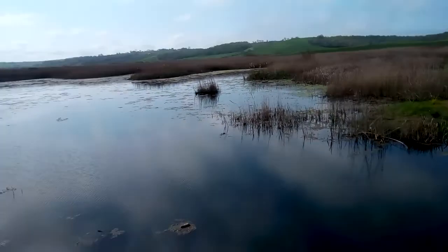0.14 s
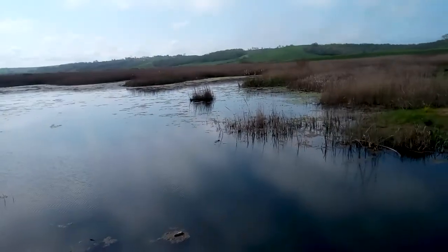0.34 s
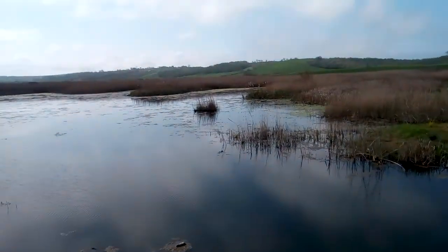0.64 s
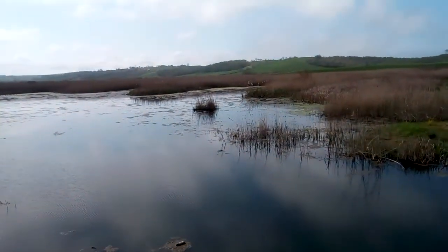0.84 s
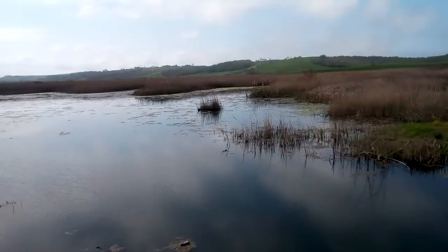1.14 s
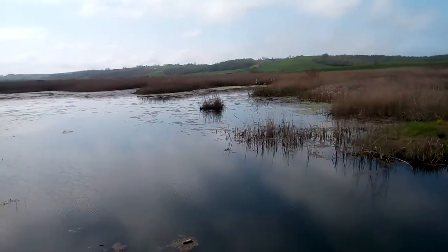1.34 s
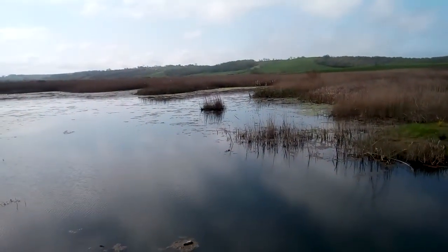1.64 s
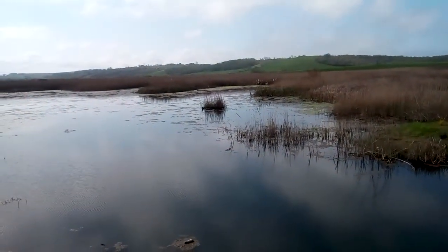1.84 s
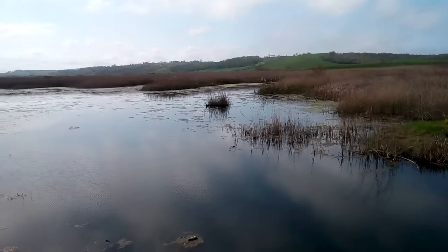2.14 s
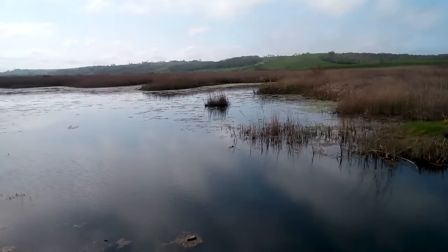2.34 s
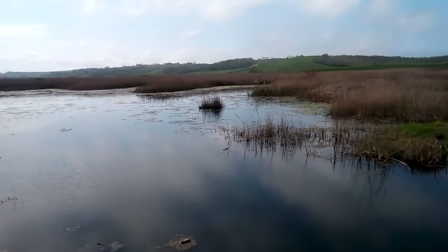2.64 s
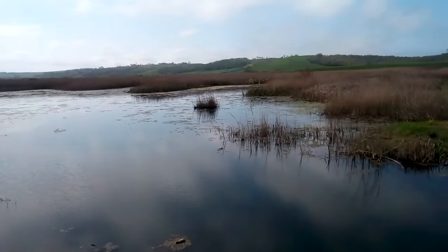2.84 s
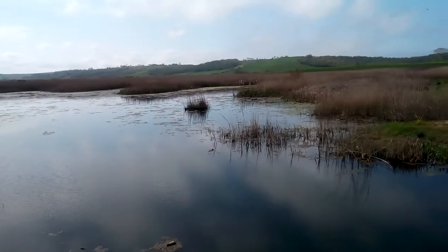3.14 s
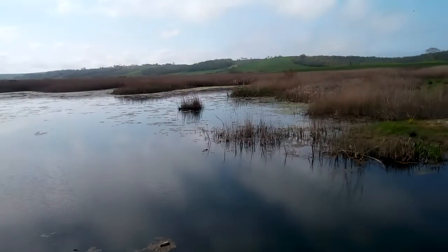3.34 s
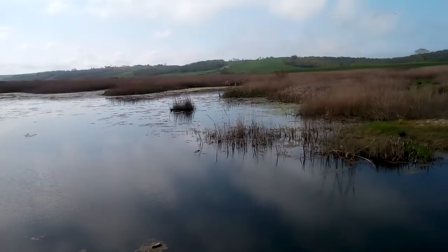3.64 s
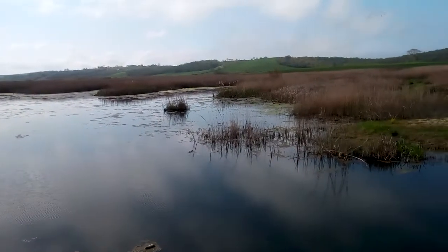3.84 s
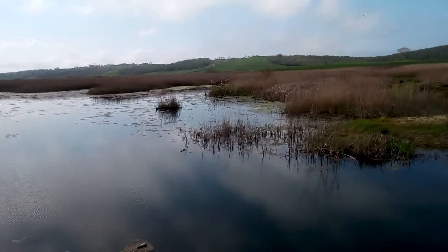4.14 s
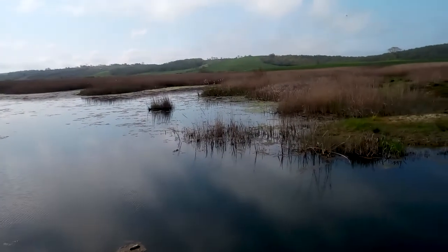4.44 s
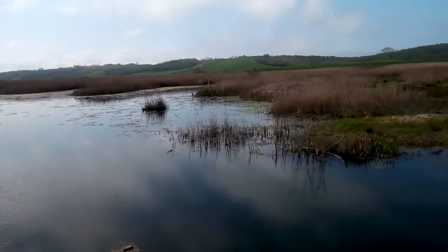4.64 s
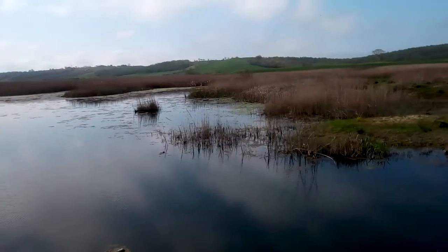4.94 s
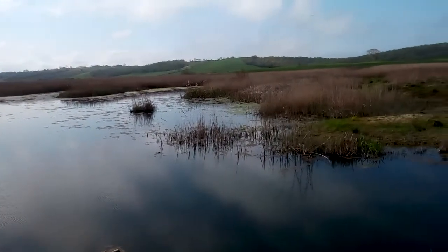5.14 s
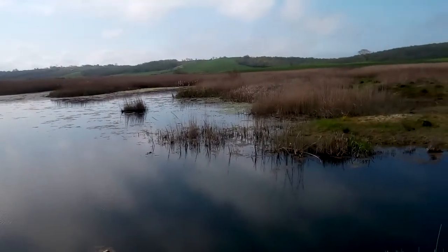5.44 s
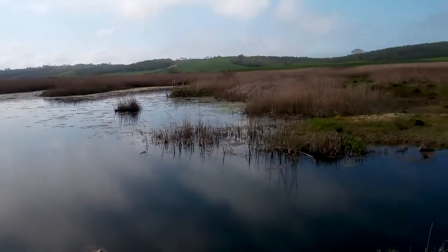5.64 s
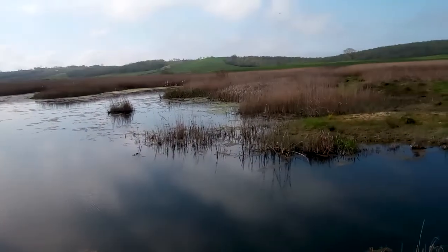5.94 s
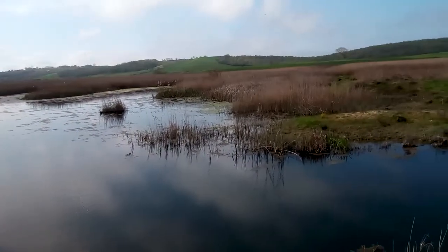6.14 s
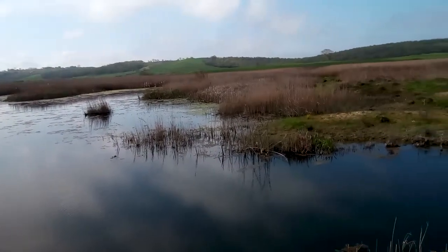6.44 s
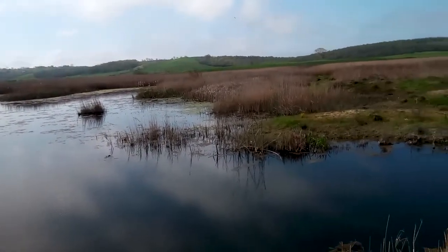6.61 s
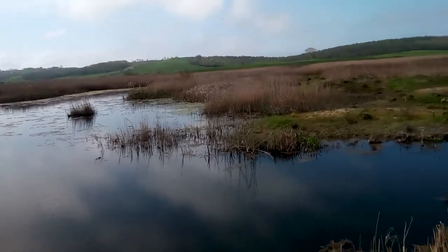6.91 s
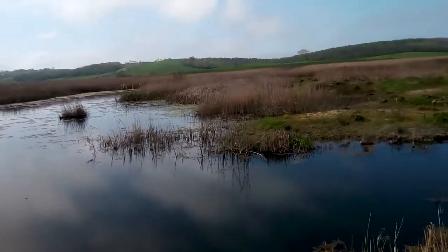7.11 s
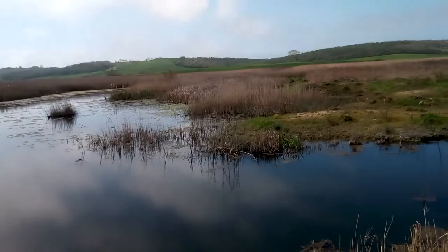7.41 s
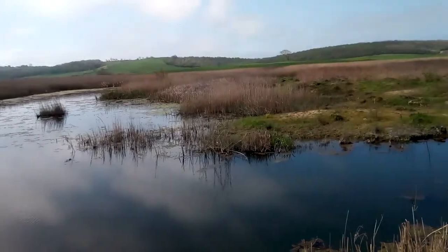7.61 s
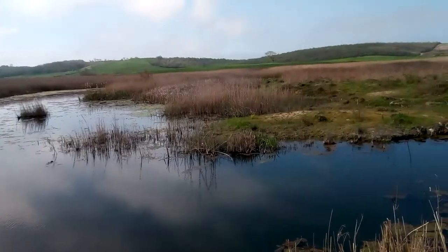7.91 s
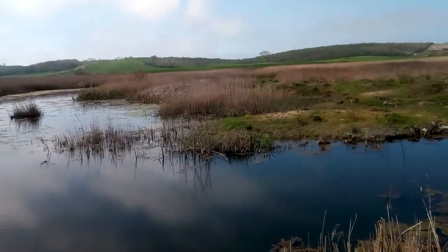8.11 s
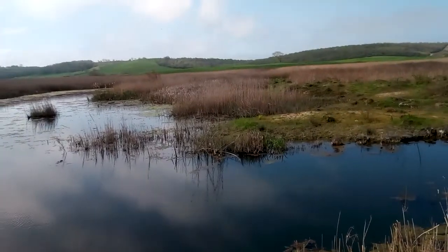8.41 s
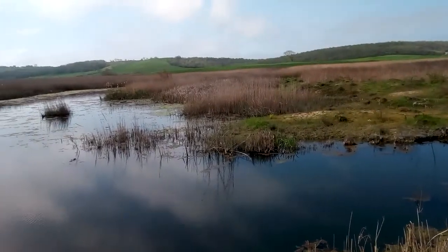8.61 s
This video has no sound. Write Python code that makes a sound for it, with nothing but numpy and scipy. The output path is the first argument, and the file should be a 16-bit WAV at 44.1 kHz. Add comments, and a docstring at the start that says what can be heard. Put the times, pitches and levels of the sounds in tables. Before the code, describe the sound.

A dense mass of croaking spreads across an open marsh pool, with short rising wails and, closer by, overlapping runs of rapid, rattling frog croaks. The near frogs are strongest in the first two thirds and then ease a little. From about four seconds in, bursts of low wind buffet the microphone, drop away briefly and return near the end, while the frogs keep calling.

```python
"""Marsh frogs laugh across a reedy pool: seven near ones, in runs of about 13 short croaks a second.
Each croak is a rattle of vocal-cord pulses, mostly slowing, that rings the throat and vocal sacs.
A run swells to a crest and tires. Farther frogs give rising wails over a distant mass of croaks.
Wind gusts buffet the microphone above a faint hiss of air."""
import sys
import numpy as np
from scipy import signal
from scipy.fft import rfft, irfft, next_fast_len
from scipy.io import wavfile
from scipy.ndimage import uniform_filter1d, map_coordinates

SR = 44100
rng = np.random.default_rng(int(sys.argv[2]) if len(sys.argv) > 2 else 0)


def log_audio(samples):
    """Write samples as a 16-bit WAV file to the path given in sys.argv[1]."""
    # one column per channel
    frames = np.atleast_2d(samples).T
    # limit to full scale, then quantise
    limited = np.clip(frames, -1, 1)
    pcm = np.round(limited * 32767).astype(np.int16)
    wavfile.write(sys.argv[1], SR, pcm)


N = 386757

# per near frog: croak length/s, first pulse rate/Hz, last pulse rate/Hz, resonance glide/ratio,
# resonance droop along a run/(ratio per s), pulse slip/rad, reed echo/dB
VOICES = [(.054, 490, 260, 0.99, 0.96, 0.86, -7.5), (.046, 760, 340, 0.92, 1, 0.41, -6.5),
          (.052, 510, 270, 0.96, 1, 0.9, -3.5), (.052, 550, 340, 0.96, .98, 0.87, 0),
          (0.054, 540, 670, 0.95, .83, 1, -6), (.062, 1000, 290, .9, 0.92, 0.6, -7.5),
          (.06, 680, 450, .94, 0.98, 0.69, -8)]
# per near frog, lower and upper resonances: f/Hz, width/Hz, level/dB
LOWER_MODES = [
    [(2410, 178, 0), (2786, 260, -13.5), (1900, 230, -12)],
    [(2680, 160, 5.5), (2290, 260, 27)],
    [(2410, 300, 2), (2860, 140, -0.5)],
    [(2390, 380, 0)],
    [(2140, 120, 0)],
    [(2235, 180, 0)],
    [(2350, 100, -3), (1906, 110, 4)],
]
UPPER_MODES = [
    [(4344, 375, 12.5), (3784, 190, 2), (3310, 270, 1.5), (4900, 400, -30.5), (6760, 1400, -21),
     (8450, 280, -13.5), (10500, 1100, -22.5)],
    [(4930, 490, 11.5), (4370, 200, 1), (3230, 1030, 9.5), (5530, 300, -19), (6870, 1200, -15.5),
     (9900, 800, -15)],
    [(4450, 330, 10), (3850, 310, 8), (3174, 320, 0), (6500, 1200, -1), (10600, 900, -17.5)],
    [(4458, 320, 6), (3385, 320, 2.5), (4110, 850, 3.5), (6700, 1000, -13)],
    [(4600, 130, -0.5), (3790, 1100, -0.5), (6320, 290, 5)],
    [(4200, 550, 8.5), (3440, 150, -4), (6480, 510, -7)],
    [(4280, 330, 11), (3570, 600, -13)],
]
# per near frog, runs: first t/s, last t/s, croaks, crest t/s, upper/dB, swell/dB, fade/dB, lower/dB
CROAK_RUNS = [
    [(1.591, 2.15, 8, 1.96, -32, 12, 4.5, -32.5), (2.438, 2.966, 8, 2.69, -27.5, 7.5, 12, -30),
     (3.219, 3.683, 7, 3.48, -27.5, 10, 2.5, -30), (3.99, 4.607, 9, 4.42, -29, 9, 7.5, -32.5),
     (4.803, 5.527, 10, 5.42, -26.5, 19, 6, -33)],
    [(0.281, 0.674, 6, 0.54, -38.5, 5.5, 0.5, -37), (0.83, 1.085, 4, 0.95, -41, 7, 1, -38),
     (1.694, 2.171, 7, 2.06, -33.5, 3, 4.5, -35), (2.39, 2.63, 4, 2.55, -43.5, 6, 0, -42),
     (3.022, 3.58, 8, 3.28, -33, 11.5, 10, -37.5), (4.671, 5.148, 7, 4.95, -28.5, 12, 7, -39.5),
     (5.245, 5.49, 4, 5.33, -45.5, -3, 2, -43), (8.1, 8.26, 3, 8.24, -44, 11, -0.5, -53)],
    [(5.569, 6.02, 7, 5.64, -40, 0.5, 6.5, -47), (6.268, 7.2, 14, 6.6, -37, 6, 7.5, -44)],
    [(7.583, 7.97, 6, 7.73, -39.5, 4, 4.5, -48.5), (8.329, 8.723, 6, 8.6, -41.5, 2, 1.5, -39)],
    [(3.78, 3.935, 3, 3.83, -48.5, 4, 2, -52), (6.045, 6.21, 3, 6.13, -45.5, 8, 4, -46),
     (7.87, 8.268, 6, 8.01, -43.5, 24.5, 4.5, -37.5)],
    [(0.001, 0.275, 4, 0.17, -38.5, 4, 2, -34.5), (1.172, 1.469, 4, 1.35, -33, 8, 2, -31.5)],
    [(6.668, 7.015, 5, 6.9, -32.5, 15, 0.5, -34.5), (7.068, 7.155, 2, 7.1, -40.5, -3, 1.5, -38.5)],
]
# rising calls: t/s, nominal length/s, first resonance/Hz, last resonance/Hz, level/dB
WAIL_CALLS = [(0.283, 0.14, 1240, 1540, -42), (0.471, 0.17, 1218, 1966, -37.5),
              (0.939, 0.19, 1106, 2005, -38.5), (1.523, 0.24, 1047, 2050, -37.5),
              (2.275, 0.25, 1404, 1943, -37.5), (2.497, 0.13, 1180, 1414, -41.5),
              (2.8, 0.11, 1380, 1766, -42.5), (3.185, 0.17, 1061, 1483, -45),
              (3.393, 0.11, 1470, 1844, -36.5), (3.899, 0.17, 1247, 1840, -38.5),
              (4.384, 0.14, 1266, 1710, -42), (5.21, 0.18, 1163, 1466, -42.5),
              (5.664, .08, 1680, 1823, -46.5), (5.794, 0.17, 1126, 1880, -46.5),
              (6.092, 0.16, 1117, 1787, -37), (6.365, 0.16, 1663, 2080, -37),
              (6.754, 0.14, 1466, 1883, -37.5), (6.938, 0.1, 1683, 2000, -38),
              (7.516, 0.15, 1085, 1936, -33), (8.123, 0.13, 1076, 2060, -32)]
# distant chorus: t/s, throat level/dB, sac level/dB
CHORUS_LEVELS = [(0.0, -37, -51), (0.41, -37.5, -39.5), (0.83, -40.5, -49), (1.66, -36.5, -41.5),
                 (1.9, -42, -41.5), (2.34, -37.5, -48.5), (2.66, -37, -41.5), (3.05, -40, -46),
                 (3.49, -41.5, -37.5), (3.79, -36, -46), (4.08, -42, -54.5), (5.08, -38, -39),
                 (5.96, -39.5, -48.5), (6.98, -38, -44), (7.23, -39, -57), (8.77, -38, -44.5)]
# wind between gusts: t/s, level/dB
BREEZE_LEVELS = [(0, -38.5), (1.6, -41), (1.9, -51.5), (2.5, -43), (3.7, -35), (5, -42), (6.1, -35),
                 (6.9, -45), (7.3, -41.5), (7.55, -33.5), (8.77, -34.5)]
# gusts: t/s, hold/s, level/dB
WIND_GUSTS = [(0.01, .18, -27), (.08, 0.086, -26), (0.57, 0.15, -33.5), (0.713, .09, -27.5),
              (1.117, .055, -27), (1.246, 0.358, -31), (2.625, 0.0098, -28.5), (2.746, .04, -30.5),
              (3.017, 0.044, -28), (3.399, .03, -27), (3.453, 0.06, -30), (3.812, 0.017, -16),
              (3.874, 0.257, -17), (4.167, 0.097, -15), (4.296, 0.17, -21.5), (4.485, 0.085, -21),
              (4.607, 0.14, -19.5), (4.78, 0.044, -18), (5.184, 0.039, -21.5), (5.275, 0.11, -23.5),
              (5.553, .07, -26), (5.71, 0.27, -22), (5.782, .045, -16), (6.018, 0.017, -21.5),
              (6.11, 0.027, -23.5), (7.006, 0.017, -31), (7.088, 0.011, -28), (7.823, .14, -21.5),
              (7.84, .07, -16.5), (8.14, .11, -29.5), (8.334, .085, -19), (8.487, 0.017, -27.5)]
# sharp eddies: t/s, level/dB, f/Hz
EDDIES = [(3.81, -11.5, 127), (3.823, -11.5, 160), (3.912, -12.5, 185), (4.029, -13, 212),
          (4.094, -12, 172), (4.189, -11, 178), (4.242, -6, 116), (4.289, -30, 196), (4.5, -6.5, 214),
          (4.634, -9, 120), (5.796, -11, 205), (7.086, -25, 195), (7.856, -8, 205), (7.869, -10.5, 232),
          (7.904, -11.5, 184)]
# noise spectra: f/Hz, level/dB
THROAT_SPECTRUM = [(300, -47), (500, -6), (850, 1), (1300, 6.5), (1850, 13.5), (2200, 8), (2600, -1.5),
                   (3200, -34.5)]
SAC_SPECTRUM = [(2000, 5.5), (2600, 12), (3000, -12.5), (4400, 12), (5100, 9.5), (5700, -1.5), (6600, -4),
                (8000, -29.5), (9500, -41)]
RUMBLE_SPECTRUM = [(20, -16), (40, -5.5), (70, 4), (115, 4), (200, -9.5), (300, -26.5), (500, -50.5),
                   (1000, -77)]
GUST_SPECTRUM = [(30, -54), (80, -3), (170, 3), (260, -4.5), (400, -15), (650, -24.5), (1000, -42.5),
                 (2500, -93)]
AIR_SPECTRUM = [(30, 6.5), (120, 14.5), (320, -41.5), (400, -3), (480, 8), (650, 7), (900, -6.5),
                (3000, -15), (7000, -24), (9000, -59), (13800, -51.5), (14700, -22.5), (15500, -32.5)]
# treble loss on the way from the frogs: f/Hz, gain/dB
PATH_GAIN = [(4900, 1.5), (5700, -6), (7000, -1.5), (8600, -13.5), (9400, -18), (11000, -8), (13000, -21.5)]
# decay in the reeds and over the open marsh: f/Hz, t60/s
REED_DECAY = [(500, 0.14), (8000, 0.017)]
MARSH_DECAY = [(500, 0.14), (2000, 0.25), (5000, 0.18), (10000, 0.82)]

GUST_ATTACK_S, GUST_RELEASE_S = .011, .014
MIC_CEILING, TOP_HZ = .65, 15550


def near_frogs():
    """Resonances sag as a croak runs out of air, for some frogs over a run too; reeds smear the pulses."""
    out = np.zeros(N)
    for runs, voice, lower, upper in zip(CROAK_RUNS, VOICES, LOWER_MODES, UPPER_MODES):
        length_s, first_hz, last_hz, glide, droop, slip_rad, reeds_db = voice
        croaks = [croak for run in runs for croak in laugh(*run)]
        for t_s, from_middle_s, upper_db, lower_db in croaks:
            tension = np.exp(.05 * rng.standard_normal())
            train = pulses(length_s, first_hz * tension, last_hz * tension, jitter=.029, scatter_db=2.4)
            sag = glide * np.exp(.012 * rng.standard_normal())
            tuning = [droop ** from_middle_s, 1, 1]
            high = ring(train, np.multiply(upper, tuning), sag, slip_rad)
            low = ring(train, np.multiply(lower, tuning), sag * .975, 1.53 * slip_rad)
            croak = amp(upper_db - 3) * high + amp(lower_db - 4.5) * low
            start_s = t_s - .59 * length_s
            add(out, start_s, croak)
            add(out, start_s, amp(reeds_db) * echo(croak, REED_DECAY, samples=2048))
    return filtered(out, lambda hz: amp(along(PATH_GAIN, hz)))


def laugh(first_s, last_s, count, crest_s, upper_db, swell_db, fade_db, lower_db):
    """Evenly paced croaks that swell, then tire: t/s, t from mid-run/s, upper/dB, lower/dB."""
    t_s = np.linspace(first_s, last_s, round(count))
    before = np.clip((crest_s - t_s) / (crest_s - first_s + 1e-9), 0, 1)
    after = np.clip((t_s - crest_s) / (last_s - crest_s + 1e-9), 0, 1)
    effort_db = -swell_db * before ** 1.8 - fade_db * after ** 1.8
    return zip(t_s, t_s - t_s.mean(), upper_db + effort_db, lower_db + .25 * effort_db)


def pulses(length_s, first_hz, last_hz, jitter, scatter_db):
    """Vocal-cord pulses of one call, swelling and then cut short: t/s, strength."""
    count = max(int(length_s * np.sqrt(first_hz * last_hz)), 4)
    rate_hz = np.geomspace(first_hz, last_hz, count)
    t_s = np.cumsum((1 + jitter * rng.standard_normal(count)) / rate_hz)
    progress = (np.arange(count) + .5) / count
    return t_s, np.sin(np.pi * progress ** 1.545) * amp(scatter_db * rng.standard_normal(count))


def ring(train, modes, glide, slip_rad):
    """Each pulse rings the gliding resonances with a random slip of phase; rms 1."""
    t_s, strength = train
    index = (np.abs(t_s[:, None]) * SR).astype(int) + 1 + np.arange(256)
    age_s = index / SR - t_s[:, None]
    progress = np.arange(index.max() + 1) / SR / t_s[-1]
    warped_s = np.cumsum(glide ** (progress - .5)) / SR
    rings = 0
    for hz, width_hz, db in modes:
        phase = 2 * np.pi * hz * rng.normal(1, .01222) * warped_s[index]
        phase += slip_rad * rng.standard_normal((len(t_s), 1))
        damping = 1.5 * np.pi * width_hz
        envelope = damping ** 1.5 * age_s * np.exp(-damping * age_s)
        rings += amp(db) * envelope * np.sin(phase)
    return unit(np.bincount(index.ravel(), (strength[:, None] * rings).ravel()))


def wailing_frogs():
    """Long hoarse calls; pitch and throat resonances climb together as the sacs fill."""
    out = np.zeros(N)
    for t_s, length_s, first_hz, last_hz, db in WAIL_CALLS:
        centre_hz, glide = np.sqrt(first_hz * last_hz), last_hz / first_hz
        train = pulses(length_s * 1.1, 200, 200 * glide, jitter=.035, scatter_db=2)
        modes = [(centre_hz, 210, 0), (centre_hz * 1.2, 240, -5), (centre_hz * .83, 200, -6)]
        wail = ring(train, modes, glide, slip_rad=.55)
        add(out, t_s - .015, amp(db - 3) * echo(wail, REED_DECAY, samples=1024))
    return out


def far_frogs():
    """Distant callers, low throats and high sacs, on a noise blur of hundreds more."""
    throat_db, sac_db = curves(CHORUS_LEVELS)
    callers = croaking_crowd(1850, spread=.17, width_hz=330, count=50)
    callers += amp(-6) * croaking_crowd(1300, spread=.142, width_hz=220, count=30)
    throats = amp(-1.5) * callers + amp(-3 + 1.3 * wobble(16)) * noise(THROAT_SPECTRUM)
    sacs = croaking_crowd(3900, spread=.3, width_hz=800, count=60)
    sacs = filtered(sacs, lambda hz: amp(along(PATH_GAIN, hz)))
    sacs = amp(-3.5) * sacs + amp(-6.5 + 4.4 * wobble(22)) * noise(SAC_SPECTRUM)
    return amp(throat_db - .5) * throats + amp(sac_db) * sacs


def croaking_crowd(centre_hz, spread, width_hz, count):
    """Eight croaks each from frogs of different sizes, blurred by the reeds; rms 1."""
    crowd = np.zeros(N)
    starts_s = np.linspace(-.5, N / SR, count)
    resonances_hz = centre_hz * np.exp(spread * rng.uniform(-1, 1, count))
    periods_s = rng.uniform(.07, .1, count)
    for start_s, hz, period_s in zip(starts_s, resonances_hz, periods_s):
        train = pulses(.055, 420, 290, jitter=.04, scatter_db=5.5)
        croak = ring(train, [(hz, width_hz, 0)], glide=.93, slip_rad=1.17)
        for k in range(8):
            add(crowd, start_s + k * period_s, amp(2 * rng.standard_normal()) * croak)
    return unit(echo(crowd, REED_DECAY, samples=2048)[:N])


def wind():
    """Lumpy buffeting; stronger gusts shed smaller, higher eddies, and the sharpest thud."""
    level_db = wind_level_db()
    gust_share = .99 / (1 + np.exp(-(level_db + 25) / 4))
    flow = np.sqrt(1 - gust_share) * noise(RUMBLE_SPECTRUM)
    flow += np.sqrt(gust_share) * amp(3.9 * wobble(70) - 5.5) * noise(GUST_SPECTRUM)
    running_rms = np.sqrt(np.abs(uniform_filter1d(flow ** 2, size=3000)) + 1e-9)
    flutter_db = 2.1 * wobble(32)
    out = amp(level_db + flutter_db) * flow / running_rms
    age_s = np.arange(SR // 40) / SR
    for t_s, db, hz in EDDIES:
        phase = 2 * np.pi * hz * (age_s - .006)
        thud = phase / (1 + phase ** 2 / 3) ** 3  # one push and pull on the diaphragm
        add(out, t_s - .003, amp(db + 8.5) * thud)
    return out


def wind_level_db():
    """Breeze plus gusts that rise fast, hold and die away."""
    t_s = np.arange(N) / SR
    power = amp(curves(BREEZE_LEVELS)[0]) ** 2
    for start_s, hold_s, db in WIND_GUSTS:
        rise = np.minimum(t_s - start_s, 0) / GUST_ATTACK_S
        fall = np.maximum(t_s - start_s - hold_s, 0) / GUST_RELEASE_S
        power += (amp(db) * np.exp(rise - fall)) ** 2
    return 10 * np.log10(power)


def echo(x, decay, samples):
    """x through a fresh diffuse tail of energy 1; each frequency has its own t60."""
    hz, t_s, bins = signal.stft(rng.standard_normal(samples), SR, nperseg=128)
    fade = amp(-60 * t_s / along(decay, hz)[:, None])
    tail = signal.istft(bins * fade, SR, nperseg=128)[1]
    return signal.fftconvolve(x, tail / np.linalg.norm(tail))


def noise(spectrum):
    """Coloured noise; rms 1."""
    return unit(filtered(rng.standard_normal(N), lambda hz: amp(along(spectrum, hz))))


def filtered(x, response):
    """x through a gain given as a function of f/Hz."""
    size = next_fast_len(N + SR // 4)
    return irfft(rfft(x, size) * response(np.fft.rfftfreq(size, 1 / SR)), size)[:N]


def wobble(rate_hz):
    """Smooth curve through random knots."""
    knots = rng.standard_normal(int(N * rate_hz / SR) + 4)
    return map_coordinates(knots, [np.arange(N) * rate_hz / SR])


def curves(rows):
    """Each column after t/s, interpolated per sample."""
    t_s, *columns = np.transpose(rows)
    return [np.interp(np.arange(N) / SR, t_s, column) for column in columns]


def along(points, hz):
    """Interpolate (f/Hz, value) points on a log axis."""
    knots_hz, values = np.transpose(points)
    return np.interp(np.log(hz + 1), np.log(knots_hz + 1), values)


def add(track, start_s, sound):
    """Mix a sound into a track."""
    start = int(start_s * SR)
    part = sound[max(-start, 0):max(N - start, 0)]
    track[max(start, 0):][:len(part)] += part


def amp(db):
    """dB to gain."""
    return 10 ** (np.asarray(db) / 20)


def unit(x):
    """Scale to rms 1."""
    return x / np.sqrt(np.mean(x ** 2) + 1e-20)


def scene():
    """Frogs, their wash over the marsh, faint air and wind; mono."""
    near, wails = near_frogs(), wailing_frogs()
    wash = echo(amp(-11.5) * near + amp(-14.5) * wails, MARSH_DECAY, samples=24000)[:N]
    return (near + wails + wash + far_frogs() + amp(-45) * noise(AIR_SPECTRUM) + wind())[None]


def record(dry):
    """The microphone rounds off the hardest gusts; nothing passes above TOP_HZ."""
    rounded = dry[0] / (1 + (dry[0] / MIC_CEILING) ** 6) ** (1 / 6)
    return filtered(rounded, lambda hz: hz < TOP_HZ)[None]


dry = scene()
out = record(dry)
log_audio(out)
```